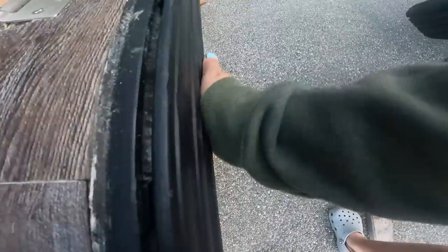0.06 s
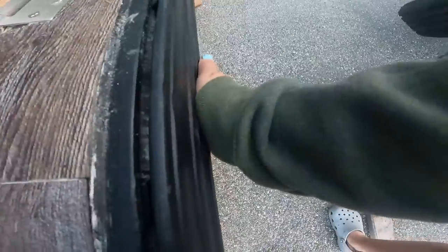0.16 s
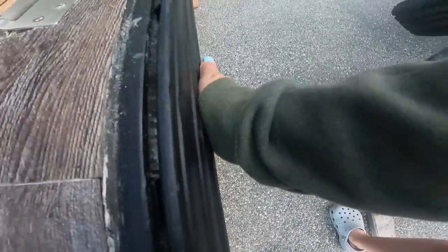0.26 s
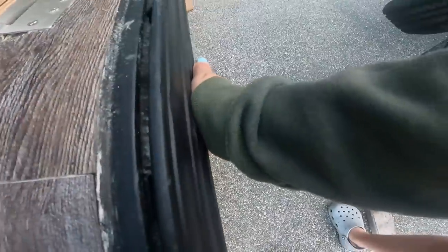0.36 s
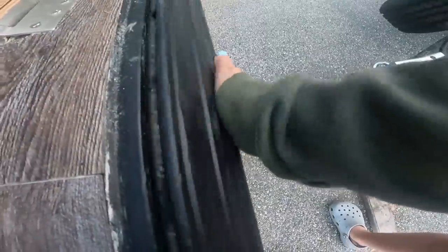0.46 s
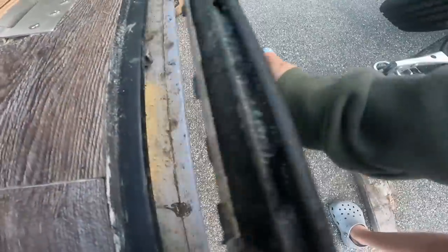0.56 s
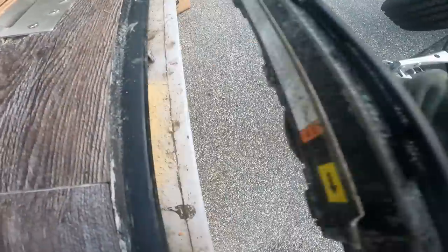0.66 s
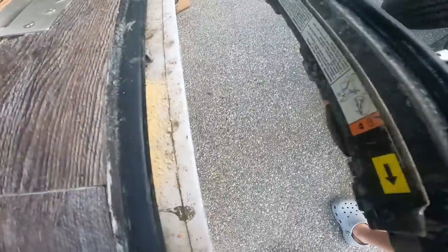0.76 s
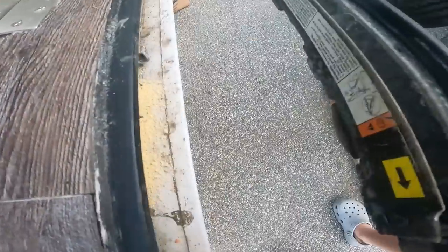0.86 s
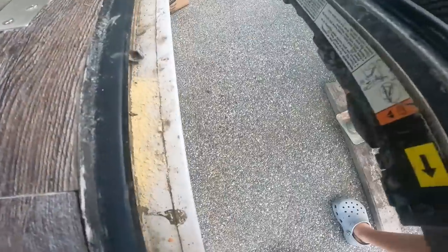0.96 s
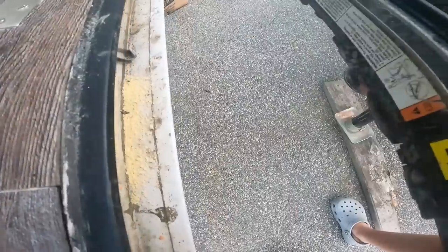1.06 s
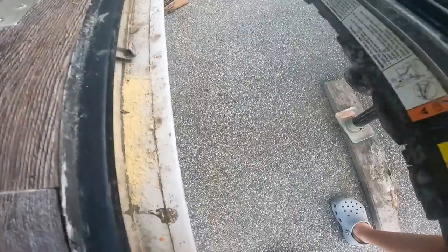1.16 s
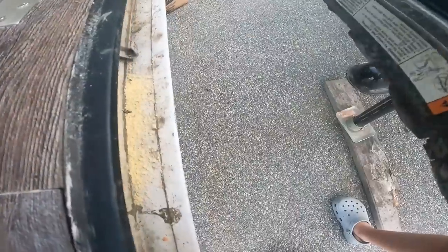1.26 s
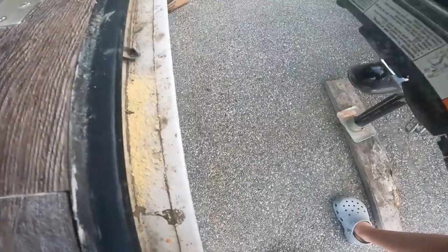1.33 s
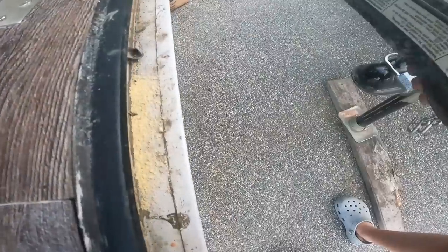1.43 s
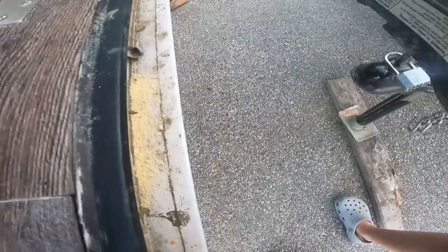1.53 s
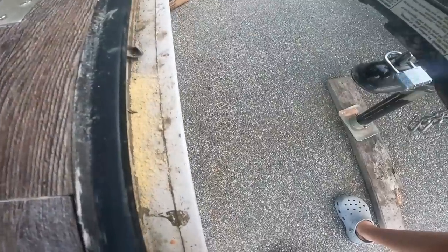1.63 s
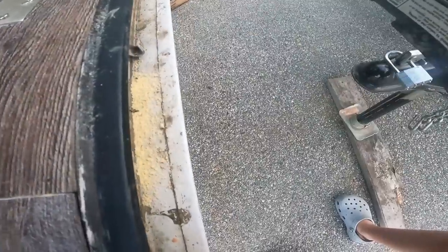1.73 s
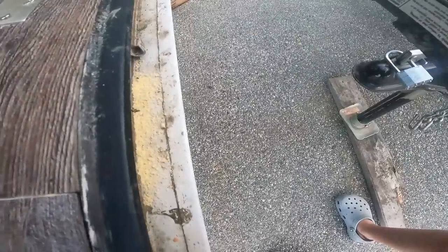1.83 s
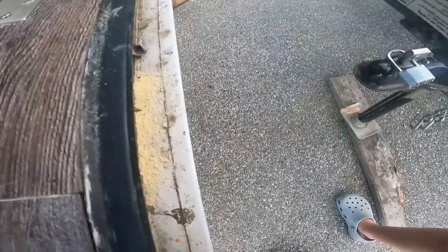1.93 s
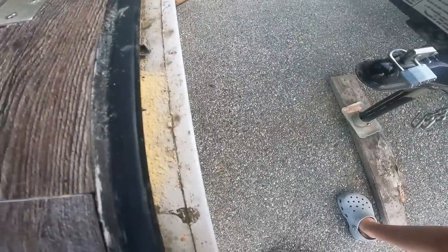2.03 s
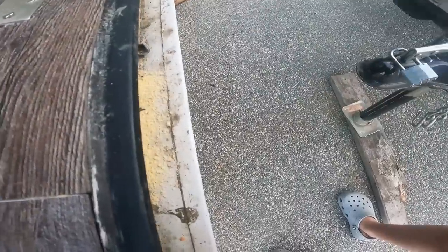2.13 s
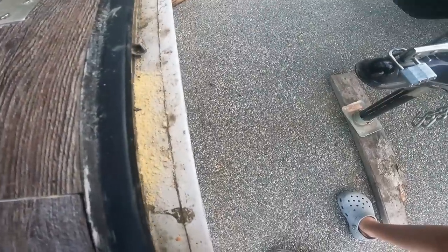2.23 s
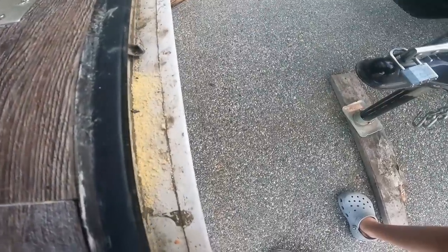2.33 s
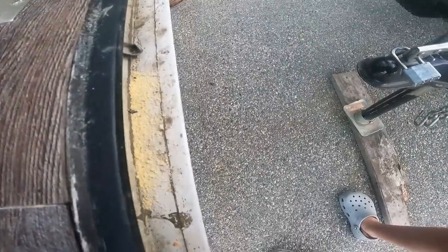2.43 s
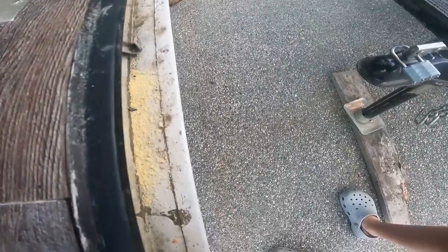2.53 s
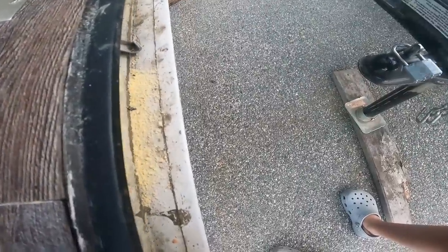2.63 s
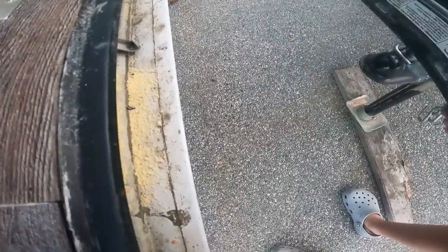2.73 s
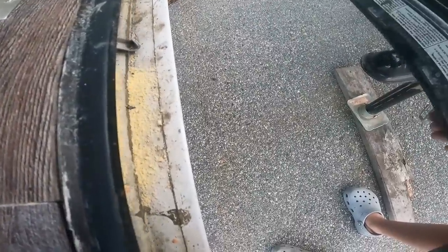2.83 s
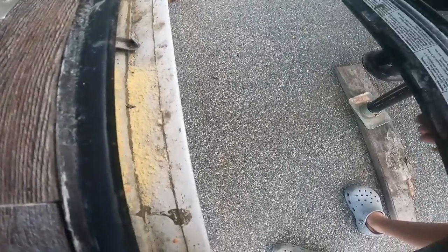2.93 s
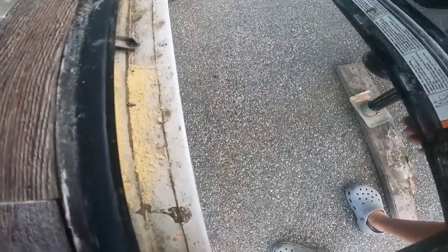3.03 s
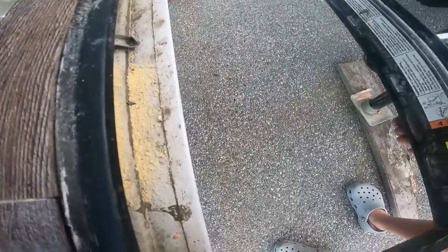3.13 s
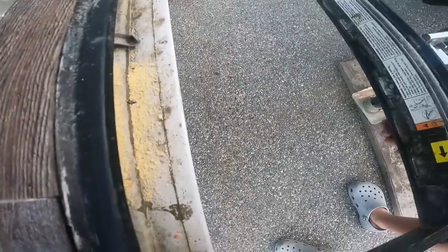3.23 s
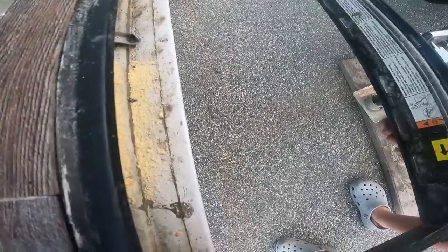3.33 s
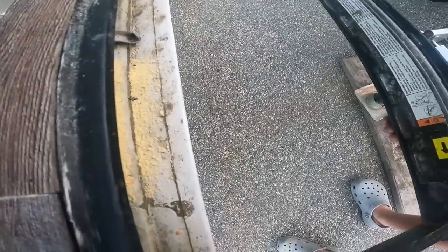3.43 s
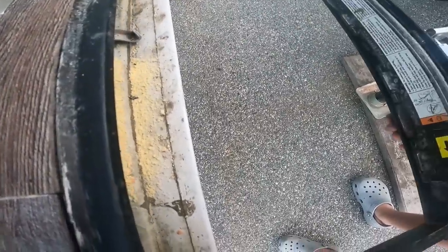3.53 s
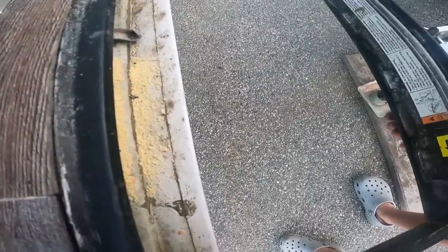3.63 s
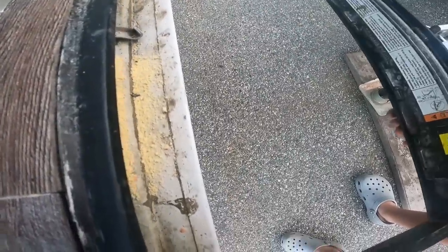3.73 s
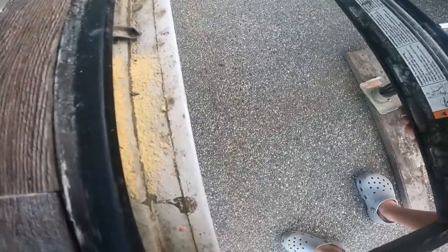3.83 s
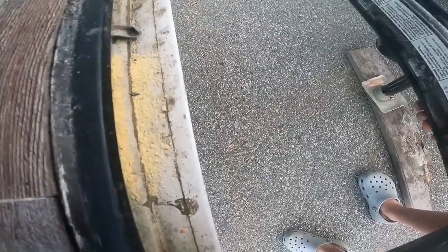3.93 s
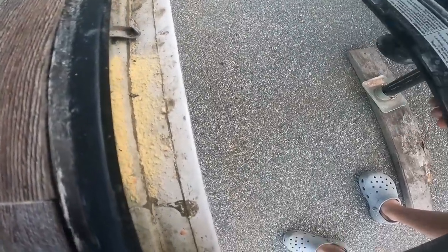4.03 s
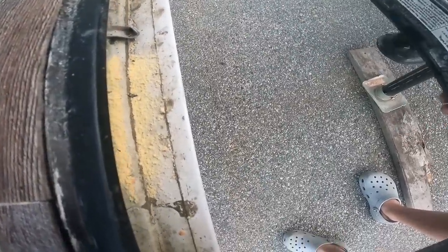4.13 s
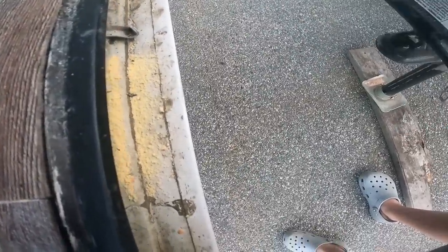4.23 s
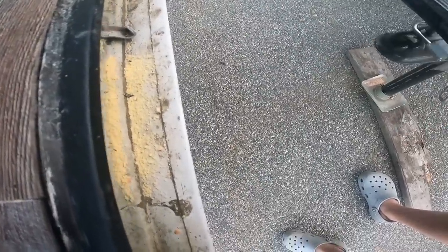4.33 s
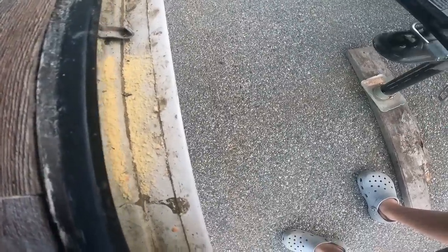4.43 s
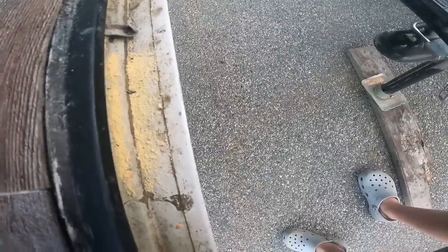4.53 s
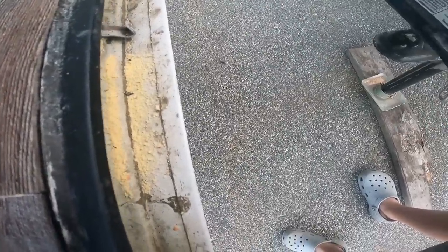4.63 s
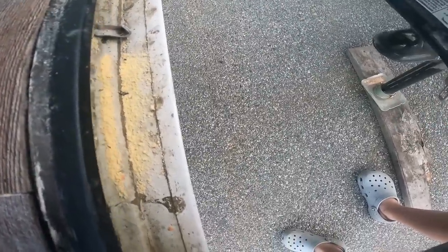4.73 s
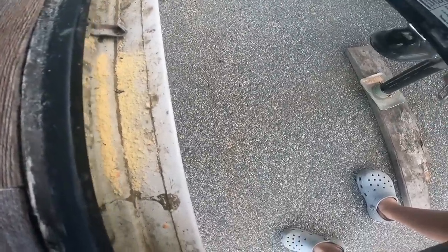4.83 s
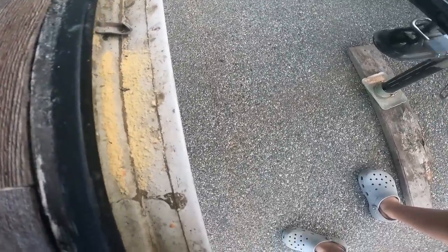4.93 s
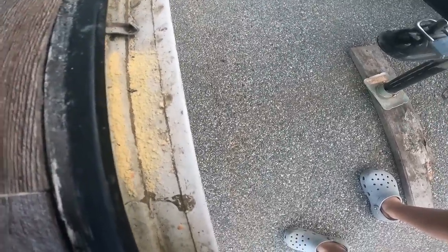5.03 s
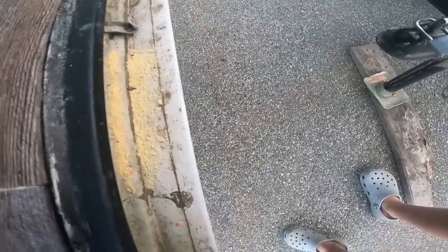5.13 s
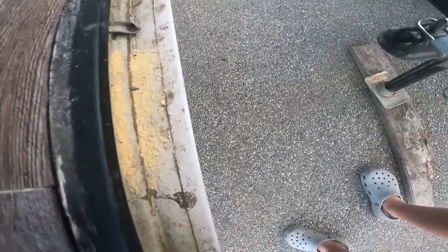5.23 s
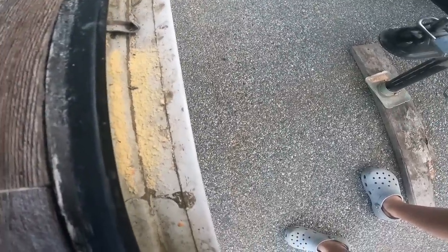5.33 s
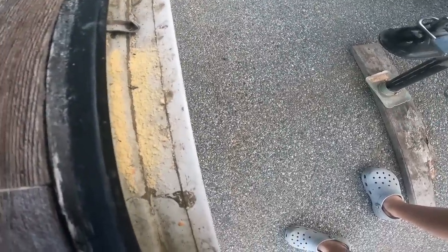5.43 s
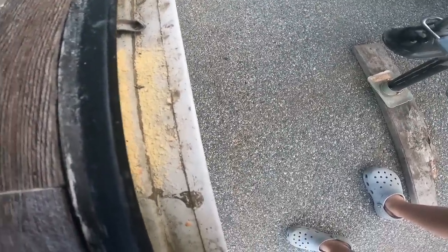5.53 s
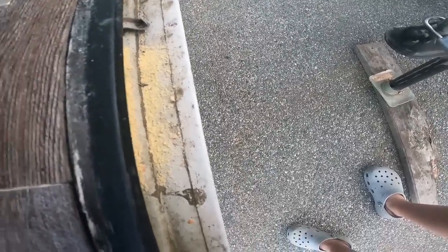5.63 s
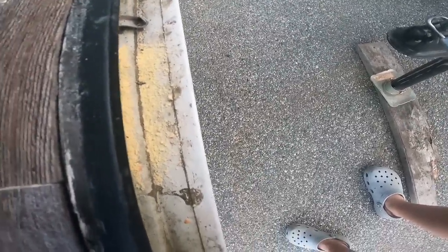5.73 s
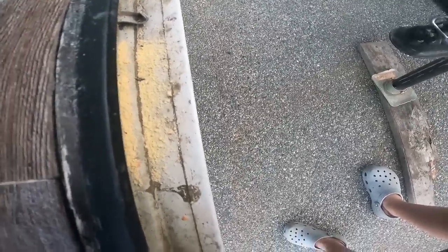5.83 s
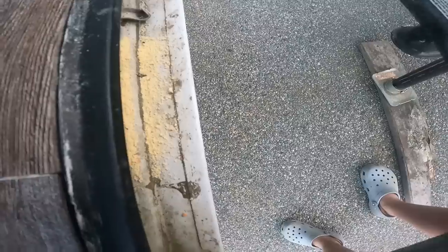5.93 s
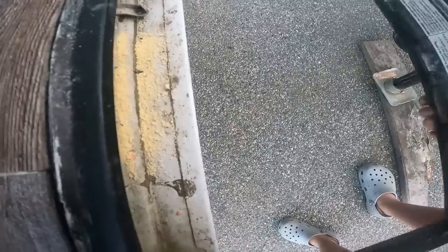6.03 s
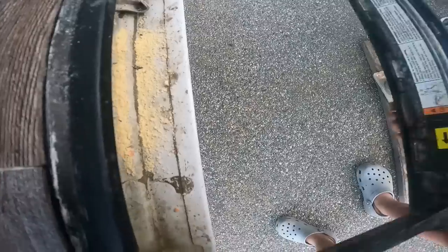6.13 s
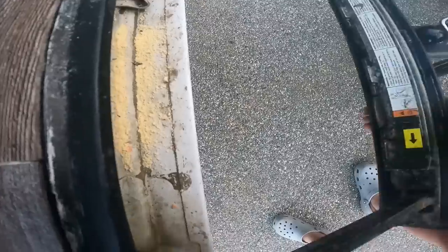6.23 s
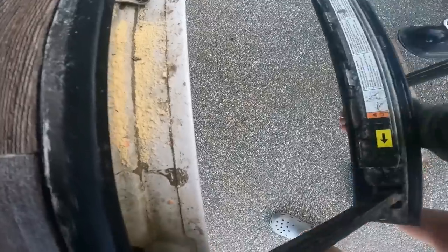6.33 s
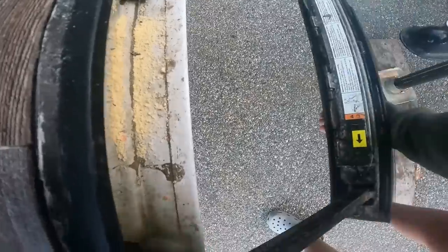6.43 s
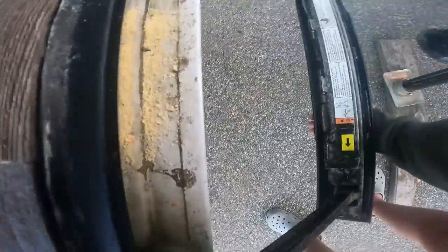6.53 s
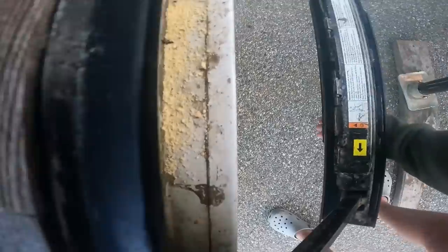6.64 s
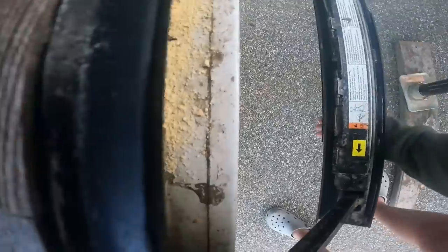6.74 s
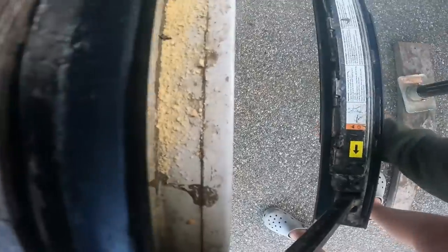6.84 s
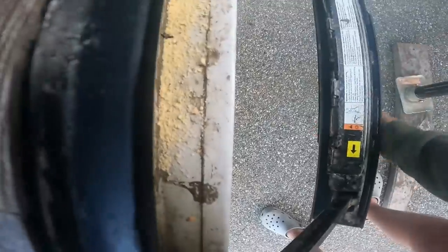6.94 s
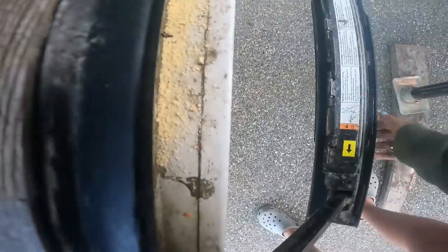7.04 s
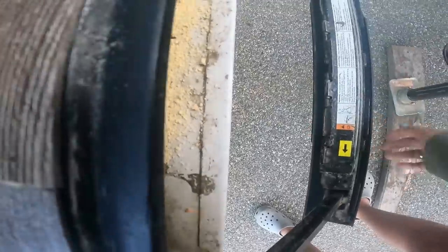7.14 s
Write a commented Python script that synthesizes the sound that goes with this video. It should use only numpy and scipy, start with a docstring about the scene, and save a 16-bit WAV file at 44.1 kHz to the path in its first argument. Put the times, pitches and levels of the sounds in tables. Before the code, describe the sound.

Outdoors, near a small microphone, the first half second holds only faint distant road noise, low wind rumble and a weak metal hum. At about 0.57 s a tailgate lets go with a loud tight cluster of clanks, short latch squeaks and panel shudder until 0.8 s. From 1.0 to 1.7 s irregular clunks and bright rattles tumble along, strongest around 1.4 s. A quieter gap holds a soft sleeve swish; at 2.35-2.55 s heavy clanks leave a brief sheet-metal ring. Small taps come at 3.1-3.4 s, a blurred faint bird chirps at 3.8 and 4.15 s, and latch clacks follow at 4.4-4.5 s. Light ticks and swishes lead to a sharp hard slam at 5.8 s with a brief squeak. Scattered knocks and rattles continue from 6.1 s, with a stronger clack at 6.73 s, fading by 7 s. The stereo image widens after 4 s.

```python
"""Pickup tailgate and camper hatch

A steel tailgate and camper hatch are unlatched, swung and knocked about an arm's length from a small camera.
Each knock is a short chatter of metal contacts ringing panel, frame and latch; loose parts rattle and squeak,
sheet tones linger and a sleeve swishes as soft noise. Filtered noise makes a road far off and light wind
rumbling on the microphone; a bird, faint with distance, calls twice in gliding tones blurred to a hiss."""
import sys
import numpy as np
from scipy import signal
from scipy.fft import rfft, irfft, next_fast_len
from scipy.io import wavfile
from scipy.ndimage import uniform_filter1d

SR = 44100
rng = np.random.default_rng(int(sys.argv[2]) if len(sys.argv) > 2 else 0)


def master(y):
    """Save y as 16-bit WAV."""
    cut = np.clip(np.atleast_2d(y).T, -1, 1)
    pcm = np.round(cut * 32767)  # scale
    wavfile.write(sys.argv[1], SR, pcm.astype(np.int16))


N = 316638
T = np.arange(N) / SR

# metal knocks; panel, frame and tick levels are relative to the latch, pitches are those of the struck spot:
# start_s, latch_peak_db, panel_db, frame_db, tick_db, latch_pitch_hz, frame_pitch_hz, chatter_t60_s
KNOCKS = [(0.5658, -4, -.5, 8, -17.5, 2050, 536, 0.018), (.612, -7, 5, 1, -20, 2150, 654, .015),
          (0.6603, -13.5, 6.5, -17, -26, 2880, 503, 0.064),
          (0.7041, -10.5, -3.5, -1, -32, 2850, 810, 0.018), (.772, -18, -6, -24, -40, 2140, 1230, 0.039),
          (0.7925, -8, -10, -23, -17.5, 2300, 925, 0.017), (.8103, -31, -11, 14, -23, 2295, 940, 0.025),
          (1.0051, -18, -14, -1.5, -41, 2090, 730, .028), (1.0248, -19, -14, -11, -23, 2470, 589, .043),
          (1.0887, -28, 3, 8, -32, 2200, 550, 0.043), (1.1358, -19, 1.5, 2, -37, 2080, 1260, .038),
          (1.1696, -8, -22, -34, -16, 2290, 781, 0.025), (1.1893, -13, -4, 4, -24, 2300, 1054, 0.053),
          (1.2094, -11.5, -2.5, -3, -26, 3270, 615, 0.043), (1.2244, -24, 11, 10.5, -29, 2360, 1036, 0.045),
          (1.2508, -19, -3, -23, -22, 2965, 538, 0.029), (1.3457, -16, -22, -3, -46, 3790, 750, .022),
          (1.3821, -15, -6, -10, -32, 2050, 820, 0.051), (1.4161, -7, -11, -17, -15, 3995, 985, .04),
          (1.4326, -6.5, -1, -5.5, -27, 2180, 1030, .02), (1.4446, -12, 2, -16, -34, 2270, 875, 0.028),
          (1.49, -20, 6, 2, -35, 2260, 1020, .038), (1.5276, -20, -2, -16, -22, 4000, 781, 0.04),
          (1.561, -21, -4, 0.5, -38, 3300, 720, .03), (1.672, -30.5, -21, -11.5, -32, 2440, 781, .03),
          (2.0384, -45, 20.5, 11, -16, 2390, 723, 0.025), (2.3424, -9, -1, 5, -20, 2860, 966, 0.013),
          (2.4059, -12, -11, -5, -26, 1890, 1170, 0.041), (2.428, -10.5, 13, 10.5, -28, 2070, 700, .045),
          (2.5372, -41, 12, 9, -26, 2335, 654, .028), (3.1269, -24, 3, 11, -10, 1940, 725, 0.011),
          (3.1884, -40.5, 0, 19.5, -37, 2420, 606, 0.033), (3.356, -44.5, 16, -3, -40.5, 2670, 746, 0.031),
          (3.371, -36, 20.5, 13.5, -20.5, 2400, 955, 0.019), (3.9189, -30, 2, 4.5, -35, 1850, 1670, .021),
          (4.0009, -47.5, 24.5, 20.5, -31, 1910, 650, .022), (4.243, -25, -3, 2, -39, 1930, 1730, .025),
          (4.3808, -17, -8, -1, -14, 2560, 850, .02), (4.4018, -14, -4, 8, -22, 2224, 920, .058),
          (4.4604, -39.5, -6, -4, 4, 2040, 818, .028), (4.503, -12, -7.5, -12.5, -37, 2500, 570, .038),
          (4.8975, -42.5, 4, -6.5, -24, 2240, 1640, .024), (4.9202, -42.5, 0, 9, -27, 2000, 1230, 0.022),
          (5.0379, -34.5, 2.5, 1.5, -24, 1960, 912, 0.032), (5.5894, -30.5, 0, 2, -30, 2540, 1670, .032),
          (5.606, -34, 3, 13.5, -32, 2300, 1615, .02), (5.642, -19, -4.5, 2.5, -42, 2100, 1700, 0.014),
          (5.736, -17, -2.5, -2, -26, 2440, 1180, .017), (5.793, -12, -18, 5, -21, 2170, 915, .027),
          (5.816, -2, -2, -4, -15, 2680, 956, 0.036), (5.8345, -10.5, 2, 8, -21, 2000, 930, 0.022),
          (5.8534, .5, 0, -9, -17, 2367, 1012, .028), (6.117, -18, 3.5, 11, -11, 1860, 1500, .012),
          (6.147, -30, 0, 14, -37, 1950, 1500, .025), (6.219, -13.5, -7, 7.5, -18, 2340, 944, 0.032),
          (6.341, -15, -2.5, -1.5, -17.5, 2960, 1110, .025),
          (6.3635, -12, -10.5, -7, -11, 2710, 936, 0.038), (6.5122, -29.5, 11.5, 5, -36, 2890, 1190, 0.022),
          (6.5516, -21, -1.5, -14, -23, 2710, 1000, 0.016), (6.691, -26.5, 10.5, 4, -37, 2400, 946, .018),
          (6.7284, -5, -12, 1.5, -34, 2340, 820, 0.046), (6.798, -16, 5, -17, -18, 2280, 920, 0.033),
          (6.8659, -24, 8.5, 5, -30, 2510, 988, 0.039), (6.9424, -35, 3, -8, -25, 2540, 1050, .042)]
# ringing modes of the sheet panel: pitch_hz, level_db, t60_s
PANEL = [(74.3, -5.5, 0.19), (117.6, -6, 0.46), (184.4, 1.5, .25), (240, -2.5, .2), (290.6, 0, 0.16),
         (349.8, 0.5, 0.2), (422.4, -3.5, 0.25)]
# ringing modes of the frame: pitch_hz, level_db, t60_s
FRAME = [(492, -8.5, 0.062), (583, -18, 0.11), (673, -11, 0.23), (766, -4, 0.1), (837, -5.5, 0.11),
         (972, -7, 0.08), (1210, -21.5, 0.039), (1120, -9, 0.12), (1404, -11.5, 0.066), (1580, -7.5, 0.096),
         (1716, 1, 0.033)]
# ringing modes of the latch parts: pitch_hz, level_db, t60_s
LATCH = [(1840, -13, 0.014), (2388, -5.5, 0.11), (2650, -1, 0.02), (2895, -6, 0.047), (3480, -7, 0.01),
         (3814, -8, 0.12), (4070, -9, 0.068), (4400, -21, 0.046), (4960, -13.5, 0.067), (5300, -12, .05)]


def undb(db):
    """Turn dB into an amplitude factor."""
    return 10 ** (np.asarray(db) / 20)


def unit(x):
    """Scale to rms 1."""
    return x / np.sqrt(np.mean(x ** 2, axis=-1, keepdims=True))


def curves(table):
    """Join the table's columns by straight lines in time."""
    time_s, *columns = np.transpose(table)
    return [np.interp(T, time_s, column) for column in columns]


def band(x, lo_hz, hi_hz):
    """Band-pass with gentle skirts."""
    edges_hz = [lo_hz, min(hi_hz, .45 * SR)]
    return signal.sosfilt(signal.butter(2, edges_hz, "bandpass", fs=SR, output="sos"), x)


def colour(x, spectrum):
    """Filter a long noise by a spectrum of (pitch_hz, level_db) points."""
    hz, db = np.transpose(spectrum)
    size = next_fast_len(N)
    bins_hz = np.maximum(np.arange(size // 2 + 1) * SR / size, 1)
    gain = undb(np.interp(np.log(bins_hz), np.log(hz), db))
    return irfft(rfft(x, size) * gain, size)[..., :N]


def walk(rate):
    """Random levels held for 1 / rate s, then smoothed twice; spread near 1."""
    hold = int(SR / rate)
    steps = np.repeat(rng.standard_normal(N // hold + 1), hold)
    return 1.33 * uniform_filter1d(uniform_filter1d(steps, hold), hold)[:N]


def gate(start_s, end_s, edge_samples):
    """On between two times, with short ramps against clicks."""
    return uniform_filter1d(1. * ((T > start_s) & (T < end_s)), size=edge_samples)


def swell(peak_s, rise_s, fade_s):
    """Power that grows to 1 at peak_s and dies away, each at an even rate in dB (s per 60 dB)."""
    before = (peak_s - T) / max(rise_s, .002)
    after = (T - peak_s) / max(fade_s, .01)
    return np.exp(-2 * np.log(1000) * np.where(T < peak_s, before, after))


def whistle(hz, spread_hz):
    """A tone blurred into a narrow hiss by quick random swings of size and sign."""
    return walk(spread_hz) * np.sin(2 * np.pi * np.cumsum(hz * np.ones(N)) / SR)


def contacts(count, per_s, spread_db):
    """Sparse metal contacts of very uneven size and random sign."""
    hit = rng.random(count) < per_s / SR
    sign = rng.choice([-1., 1.], count)
    return hit * sign * undb(spread_db * rng.exponential(size=count))


def ring(modes, t, scatter_db):
    """Decaying modes; each blow lands elsewhere and so weights and detunes them anew."""
    hz, db, t60_s = np.transpose(modes)[:, :, None]
    weight, detune = rng.standard_normal((2, len(modes), 1))
    envelope = undb(db + scatter_db * weight - 60 * t / t60_s)
    return np.sum(envelope * np.sin(2 * np.pi * hz * (1 + .012 * detune) * t), axis=0)


def outdoors():
    """Distant road as noise whose low and high bands flicker apart, and wind rumble on the microphone ports."""
    # far road and wind at the microphone: start_s, road_level_db, wind_level_db
    air = [(0.0, -47.5, -43), (0.44, -44.5, -44.5), (0.68, -59, -35.5), (1.08, -46, -40),
           (1.38, -46.5, -28.5), (1.64, -44.5, -36), (2.1, -48, -39), (2.42, -40, -47), (2.56, -51.5, -32),
           (2.88, -49, -41.5), (3.24, -44.5, -43), (4.38, -44.5, -36), (4.66, -45.5, -38.5),
           (5.54, -44.5, -38), (5.8, -41, -52.5), (5.98, -46.5, -35.5), (6.24, -47, -40),
           (7.18, -44.5, -38.5)]
    # spectrum of the far road: pitch_hz, level_db
    road_colour = [(41, -39), (70, -6), (217, -17.5), (237, -21), (369, -22), (451, -26), (1340, -23),
                   (1860, -32.5), (2430, -43), (14000, -99)]
    road_db, wind_db = curves(air)
    mid, side = colour(rng.standard_normal((2, N)), road_colour)
    scale = np.std(band(mid, 700, 1600))  # the road level is that of this band
    low = band(mid, 40, 500)
    mid = low * undb(0.63 * walk(4.1)) + (mid - low) * undb(1.2 * walk(7))
    side = .45 * (side - 0.78 * band(side, 40, 500))  # the lows are more nearly alike in both ears
    road = undb(road_db) / scale * np.array([mid + side, mid - side])
    common, opposed = unit(band(band(rng.standard_normal((2, N)), 29, 64), 13, 90))
    wind = common + 0.22 * opposed * np.array([[1], [-1]])
    return road + undb(wind_db + 0.73 * walk(4)) * wind


def rattle():
    """Dense small contacts and rubbing ring the latch modes, and the panel shudders under the hand."""
    # bouts of handling that shake the loose parts; top is relative to rattle, rise and fade are per 60 dB:
    # peak_s, rattle_db, top_db, shudder_db, rise_s, fade_s
    shakes = [(0, -54, -18, -39.5, 1, .8), (.57, -26, -14, -16, -0.0837, 0.39),
              (.71, -26, -23, -25.5, .5, 0.36), (.83, -34.5, -15.5, -27, 0.1, 0.42),
              (1.03, -45, -25, -34, 0.5, 1.5), (1.13, -36, -21, -29, 0.12, 0.07),
              (1.19, -25, -18, -30, 0.06, 0.13), (1.26, -39, -17.5, -24, -0.3, 0.12),
              (1.435, -20, -17, -18.5, 0.12, 0.34), (1.55, -40.5, -23, -30.5, 1.3, 0.59),
              (1.87, -68, -17, -48, 0.7, 3.5), (2.24, -48, -5, -36, 0.2, .5),
              (2.345, -21, -14, -30.5, 0.1059, 0.15), (2.38, -29.5, -14.5, -25, 0.4445, 0.26),
              (2.43, -23, -15.5, -14.5, 0.1746, 0.1842), (2.53, -52, -11.5, -25, 0.5, 0.34),
              (3.14, -47, -4, -30, -0.05, 0.14), (3.21, -59.5, -9.5, -41.5, 0.1, 0),
              (3.37, -45.5, -28, -32, 0.2, -0.11), (3.93, -55, -22, -47.5, -0.4, 1.3),
              (4.26, -52.5, -15, -45, .4, 1), (4.395, -23.5, -16, -34, 0.08, 0.06),
              (4.51, -32, -25, -28, 0.22, 0.14), (4.8, -61, -13.5, -40, .5, -0.4),
              (5.1, -51.5, -9, -34, 0.17, 0.1), (5.62, -48.5, -19, -40.5, 0.5, 1.2),
              (5.745, -29.5, -17.5, -25, 0.16, 0.17), (5.855, -21.5, -15, -11.5, 0.19, 0.13),
              (5.92, -42, -16.5, -23.5, 0.17, 0.47), (6.13, -41, -14, -40, 0, 0.2),
              (6.23, -51, -18, -24, -0.47, 0.44), (6.29, -49, -20, -28, .3, 0.58),
              (6.37, -31, -17, -23.5, 0.18, 0.13), (6.56, -52, -15, -47, 0.5, 1.7),
              (6.75, -28.5, -33, -15, -0.01, .3), (6.85, -62, -14, -29, -1.3, .4),
              (7.1, -64, -8, -50, .6, .8)]
    # spectrum of the scraping: pitch_hz, level_db
    scrape_colour = [(300, -22.5), (600, 2.5), (1000, 4), (2000, 1), (3000, 3.5), (4500, -7), (6500, -18.5),
                     (9000, -39)]
    # spectrum of the bright top: pitch_hz, level_db
    bright_colour = [(3500, -25.5), (5800, -4), (8000, -4), (11000, -17), (15000, -40)]
    rest_db, rest_shudder_db, rest_top_db = -77.5, -55, -15  # the parts never lie quite still
    # what each knock adds, against its own latch and panel level
    jolt_db, jolt_shudder_db, jolt_fade_s = -22, -17.5, 0.15

    bouts = list(shakes)
    for start_s, latch_db, panel_db, *_ in KNOCKS:
        shudder_db = latch_db + panel_db + jolt_shudder_db
        bouts.append((start_s, latch_db + jolt_db, rest_top_db, shudder_db, 0, jolt_fade_s))

    # overlapping bouts add as powers
    loose_power = undb(rest_db) ** 2
    bright_power = undb(rest_db + rest_top_db) ** 2
    shudder_power = undb(rest_shudder_db) ** 2
    for peak_s, db, top_db, shudder_db, rise_s, fade_s in bouts:
        shape = swell(peak_s, rise_s, fade_s)
        loose_power = loose_power + shape * undb(db) ** 2
        bright_power = bright_power + shape * undb(db + top_db) ** 2
        shudder_power = shudder_power + shape * undb(shudder_db) ** 2

    t = np.arange(SR // 4) / SR
    rubbing = rng.standard_normal(N)
    grit = unit(unit(contacts(N, 4000, 2.5)) + rubbing) * undb(3.6 * walk(60))
    rings = unit(signal.fftconvolve(grit, ring(LATCH, t, 1.0))[:N])
    scrape = unit(colour(grit, scrape_colour)) + undb(-11) * rings
    scrape = scrape / np.std(band(scrape, 2680, 6000))  # the rattle level is that of this band
    top = unit(colour(grit, bright_colour))

    drag = band(band(rng.standard_normal(N) * undb(2.5 * walk(50)), 90, 800), 60, 1400)
    shaken = signal.fftconvolve(drag, ring(PANEL + FRAME[:5], t, 0.53))[:N]
    shudder = unit(unit(shaken) + undb(6.0) * unit(drag))
    return np.sqrt(loose_power) * scrape + np.sqrt(bright_power) * top + np.sqrt(shudder_power) * shudder


def lingering_tones():
    """Single sheet modes outlast a blow, fading slowly with an unsteady level."""
    # sheet tones, the first from a blow just past: start_s, pitch_hz, level_db, t60_s
    lingers = [(0, 487, -47, 2.9), (2.439, 365.6, -38, 1.5), (2.44, 665, -25, 0.59)]
    out = np.zeros(N)
    for start_s, hz, db, t60_s in lingers:
        age_s = T - start_s
        level = undb(db - 60 * np.abs(age_s) / t60_s + 3.5 * walk(25))
        out += (age_s > 0) * level * np.sin(2 * np.pi * hz * age_s)
    return out


def swishes():
    """Sleeve and hand brush past as broad soft noise that swells and fades."""
    # soft swishes: peak_s, level_db, half_length_s
    brushes = [(0.18, -62, 0.01), (0.5, -62, 0.014), (1.853, -53.5, 0.038), (2.027, -58.5, 0.027),
               (2.748, -68, 0.05), (4.06, -61.5, 0.037), (4.796, -63, 0.053), (4.92, -65.5, 0.024),
               (5.111, -51.5, 0.032), (5.283, -60, 0.038), (5.552, -52.5, 0.031)]
    level = sum(undb(db) * np.exp(-((T - peak_s) / half_s) ** 2) for peak_s, db, half_s in brushes)
    return level * undb(1.4 * walk(70)) * unit(band(rng.standard_normal(N), 1800, 5700))


def knocks():
    """Each chatter of contacts drives panel, frame, latch and tick; softer contact reaches the lower parts."""
    # short bright ticking modes: pitch_hz, level_db, t60_s
    tick = [(6500, -8, .06), (6340, 7, 0.039), (7500, -5, 0.1), (7500, -6, .06), (9340, -6, 0.13)]
    # countless unresolved sheet modes around panel, frame, latch and tick; level is against the clear modes:
    # low_hz, high_hz, t60_s, level_db, contact_half_width_ms
    sheets = [(61, 495, 0.22, 0.5, 1.52), (394, 1950, 0.061, -0.5, 0.23), (1540, 4800, 0.044, 0.5, .07),
              (5470, 10000, .035, -2, .005)]
    build_up_s = .003  # the first small contacts before the main one
    out, t = np.zeros(N + SR), np.arange(SR // 4) / SR
    lead = SR // 40
    u = t[:SR // 10] - lead / SR  # time from the main contact, s
    for start_s, latch_db, panel_db, frame_db, tick_db, latch_hz, frame_hz, chatter_s in KNOCKS:
        shape = np.where(u < 0, 0.7 * np.exp(u / build_up_s), undb(-60 * u / chatter_s))
        blow = contacts(len(u), 3000, 2.18)
        blow[lead] = 4.22  # the main contact
        blow = blow * shape
        # the spot that was struck adds a strong mode to frame and latch
        parts = PANEL, FRAME + [(frame_hz, 9, .05)], LATCH + [(latch_hz, 11, .05)], tick
        levels_db = panel_db, frame_db, 0, tick_db
        i = int(start_s * SR) - lead
        for modes, db, (lo_hz, hi_hz, t60_s, sheet_db, half_ms) in zip(parts, levels_db, sheets):
            sheet = band(rng.standard_normal(len(t)) * undb(-60 * t / t60_s), lo_hz, hi_hz)
            body = unit(ring(modes, t, 2.2)) + undb(sheet_db) * unit(sheet)
            push = np.hanning(int(half_ms * SR / 500) + 3)
            part = signal.fftconvolve(np.convolve(blow, push), body)[:len(t)]
            part = part * np.cos(2 * np.pi * t) ** 2  # fades to nothing by 0.25 s
            out[i:i + len(t)] += undb(latch_db + db) * part / np.abs(part).max()
    return out[:N]


def squeaks():
    """Latch parts squeak as they slide: rough tones of steady pitch."""
    # squeaks: start_s, end_s, pitch_hz, level_db
    slides = [(0.582, 0.61, 2060, -17), (0.655, 0.702, 2803, -24), (0.707, 0.745, 2300, -27.5),
              (5.844, 5.918, 2413, -30), (6.736, 6.796, 2450, -28)]
    out = np.zeros(N)
    for start_s, end_s, hz, db in slides:
        out += gate(start_s, end_s, 400) * undb(db) * whistle(hz, 220)
    return out


def bird():
    """Faint gliding calls, blurred by distance."""
    # glides of the bird, the first two overlapping as one call; points of each: time_s, pitch_hz, level_db
    glides = [
        [(3.78, 3300, -64), (3.8, 3600, -62), (3.825, 3740, -67)],
        [(3.815, 4750, -67), (3.86, 4760, -67), (3.885, 4300, -70), (3.91, 3900, -70)],
        [(4.125, 3150, -60), (4.145, 3840, -57), (4.18, 3500, -57), (4.21, 3330, -58), (4.235, 3250, -64)],
    ]
    out = np.zeros(N)
    for glide in glides:
        hz, db = curves(glide)
        out += gate(glide[0][0], glide[-1][0], 300) * undb(db) * whistle(hz, 350)
    return out


def scene():
    """Metal close by with its short echo, over the open air, in a stereo image that starts centred and widens."""
    # where the hands work, ahead of the narrowing below: time_s, left_minus_right_db
    hands = [(4.2, 3), (4.7, 1.5), (5.5, 1), (5.72, .8), (6.15, 0.2), (6.4, 1.5), (7.18, 2.8)]
    # stereo width, 0 centred to 1 full: time_s, width
    spread = [(0, 0), (3.9, 0), (4.05, 0.09), (4.35, 0.25), (4.6, 0.4), (5.2, 0.65), (7.18, 0.98)]
    metal = knocks() + rattle() + lingering_tones() + squeaks() + swishes()
    near = band(metal, 78, 21000)  # the thin panels radiate no deep bass
    pan_db, = curves(hands)
    # ground and truck body return a short echo, different at each microphone
    t = np.arange(SR // 8) / SR
    tail = band(rng.standard_normal((2, len(t))) * undb(-60 * t / 0.094), 200, 11000)
    tail = tail / np.sqrt(np.sum(tail[0] ** 2))
    echo = signal.fftconvolve(near[None], tail, axes=1)[:, :N]
    panned = near * undb(np.array([pan_db, -pan_db]) / 2)
    left, right = panned + undb(-9.5) * echo + outdoors() + bird()
    left = np.roll(left, 1)  # the left port sits a little further away: one sample
    width, = curves(spread)
    mid, side = (left + right) / 2, width * (left - right) / 2
    return np.array([mid + side, mid - side])


def record(dry):
    """Peaks beyond full scale clip; a steep low-pass then cuts the top."""
    low_pass = signal.ellip(10, .2, 90, 15660, fs=SR, output="sos")  # ripple dB, stopband dB, edge Hz
    return signal.sosfilt(low_pass, np.clip(dry, -1, 1))


dry = scene()
out = record(dry)
master(out)
```